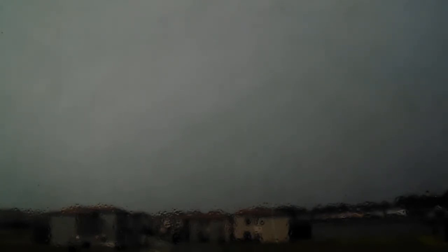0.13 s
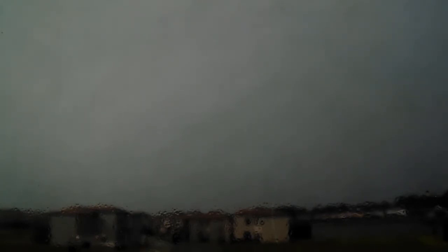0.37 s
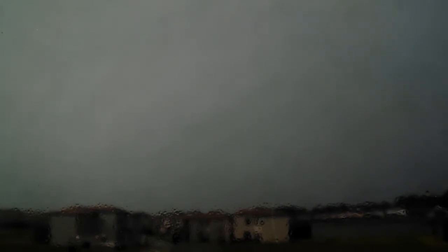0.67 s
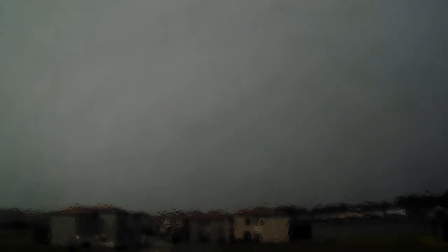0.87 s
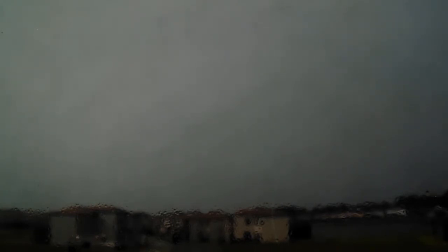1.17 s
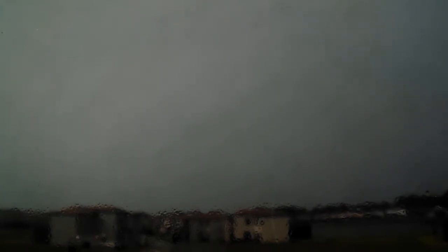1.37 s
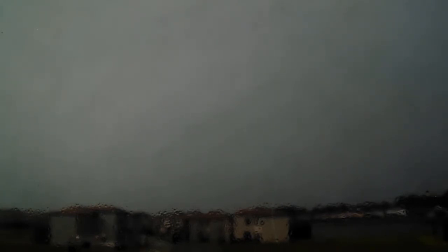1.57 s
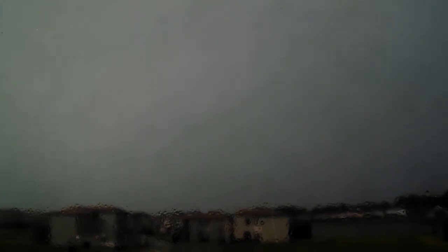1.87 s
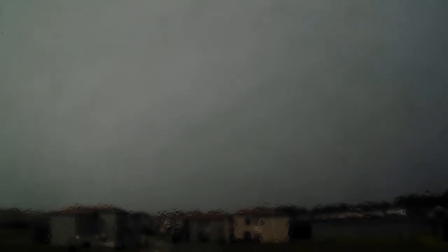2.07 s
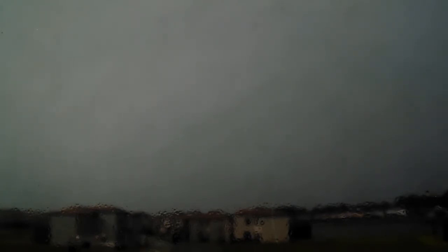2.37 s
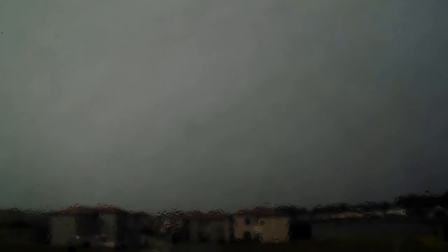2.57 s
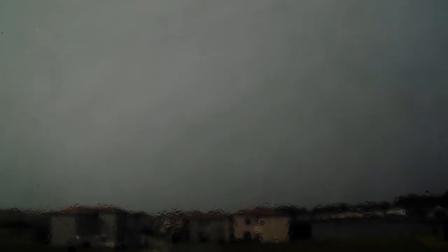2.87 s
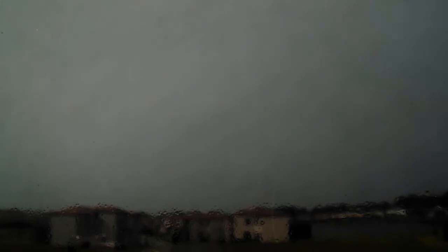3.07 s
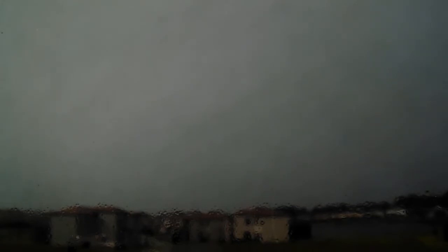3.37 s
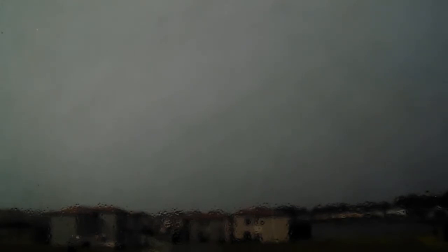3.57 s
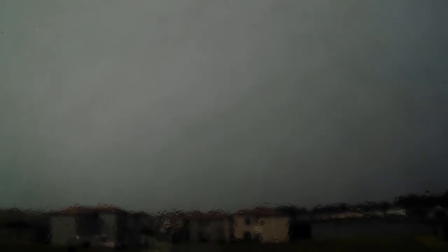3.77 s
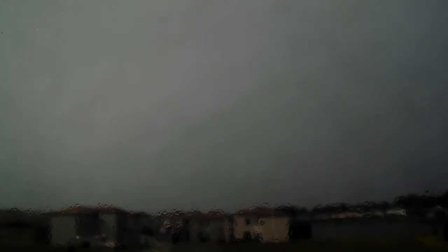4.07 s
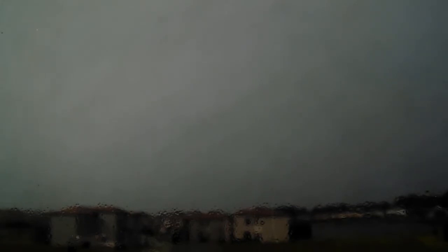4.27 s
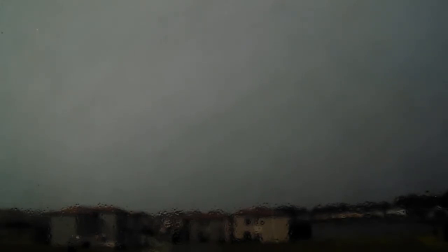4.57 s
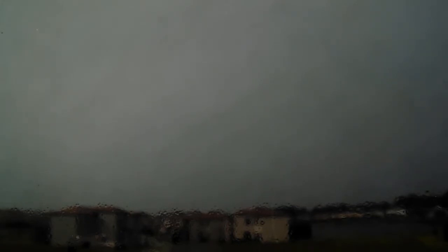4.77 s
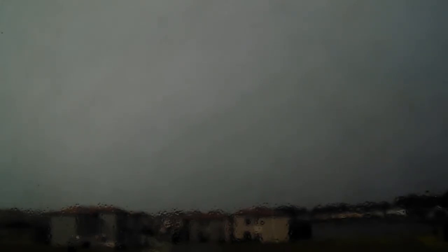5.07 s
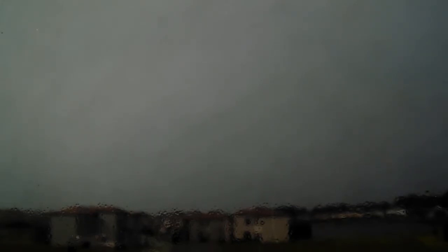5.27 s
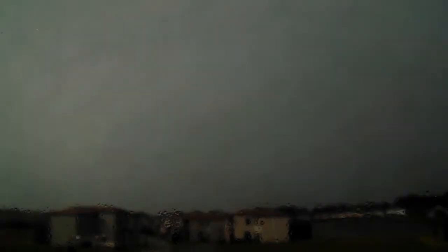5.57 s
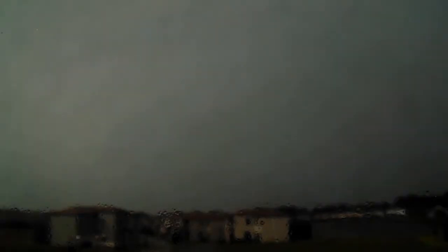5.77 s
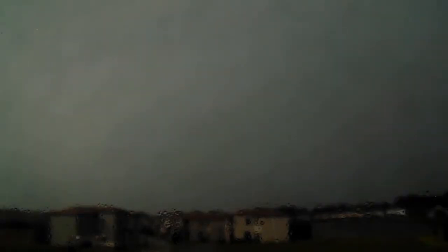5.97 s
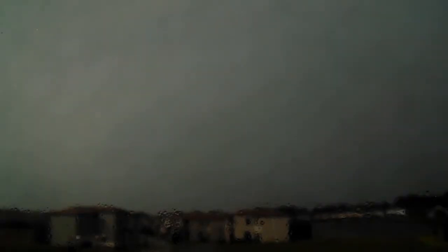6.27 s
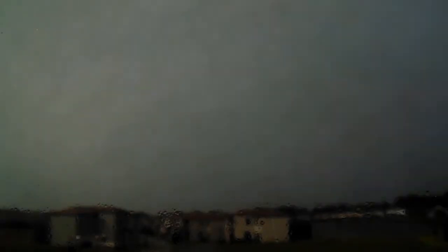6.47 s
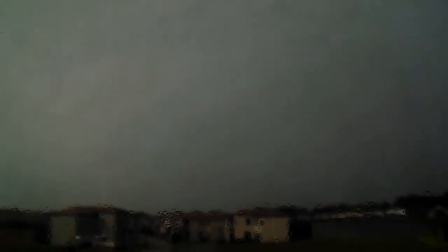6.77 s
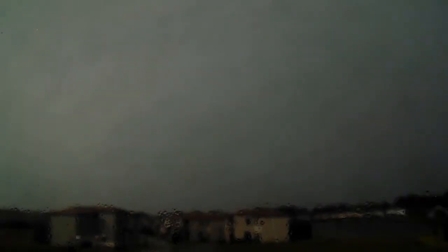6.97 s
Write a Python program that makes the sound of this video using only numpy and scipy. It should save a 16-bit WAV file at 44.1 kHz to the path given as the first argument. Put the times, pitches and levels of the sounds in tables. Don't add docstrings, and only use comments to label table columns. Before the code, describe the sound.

Inside a small room beside a window during a downpour. Far rain makes a steady soft wash and hiss. Close by, sharp bright drops tick and splatter irregularly on a metal sill, with glassy spits and duller knocks on the frame. Low thunder rolls in uneven waves for the first two seconds, then fades; near the end the dripping thins out.

```python
import sys
import numpy as np
from scipy import signal
from scipy.fft import rfft, irfft, next_fast_len
from scipy.io import wavfile
from scipy.ndimage import uniform_filter1d

SR = 44100
rng = np.random.default_rng(int(sys.argv[2]) if len(sys.argv) > 2 else 0)


def makeup_ratio(level_db):
    decades = np.asarray(level_db, float) / 20
    return 10 ** decades


def unload_audio(sound):
    columns = np.transpose(np.atleast_2d(sound))
    steps = np.round(np.clip(columns, -1, 1) * 32767)
    wavfile.write(sys.argv[1], SR, steps.astype(np.int16))


N = 314543

# f/Hz, width/Hz, level/dB
SILL_MODES = [(3535, 172, 2), (3650, 142, 6), (3850, 140, 4), (4010, 134, 2), (4360, 87, 5.5),
              (4575, 275, 1.5), (4870, 280, -24.5), (5380, 150, -21), (6270, 360, -22)]
# f/Hz, width/Hz, level/dB
PANE_MODES = [(6340, 790, 13.5), (7300, 83, 11), (7720, 1400, 8.5), (8380, 150, 12), (10000, 1100, 12),
              (10200, 520, 13), (12900, 960, -24)]
# t/s, peak level/dB, centre f/Hz
SPLASHES = [(0.0468, -15.5, 4560), (0.196, -13.5, 3840), (0.2628, -16.5, 4540), (0.5049, -16.5, 3970),
            (0.872, -16.5, 3870), (1.1912, -21, 4370), (1.8046, -19, 4580), (1.8606, -15, 4000),
            (2.0535, -20.5, 3670), (2.335, -22, 3640), (2.5975, -9, 3800), (2.6532, -18.5, 3740),
            (3.041, -17, 4120), (3.1772, -20.5, 3740), (3.2565, -16, 4550), (3.3348, -18, 4850),
            (3.495, -21, 3680), (3.5633, -19, 3900), (3.679, -20.5, 4450), (3.8328, -17.5, 4540),
            (3.8833, -11.5, 4450), (4.0496, -19, 4030), (4.0911, -18, 4360), (4.8984, -13, 4300),
            (5.2087, -17, 4000), (5.4202, -17, 3800), (5.5244, -20, 3980), (5.9189, -19, 3850),
            (6.391, -22.5, 4450), (6.5588, -23.5, 4100)]
# t/s, peak level/dB, centre f/Hz
SPLATTERS = [(0.7323, -17, 3740), (0.892, -19.5, 5100), (0.9307, -19, 3240), (0.97, -17.5, 4020),
             (1.13, -20.5, 3680), (1.2138, -17.5, 4240), (1.415, -18.5, 4440), (1.5357, -18.5, 4660),
             (1.964, -16, 3700), (2.0168, -22, 4460), (2.089, -15.5, 4200), (2.2338, -21, 3650),
             (2.5721, -18.5, 4300), (2.8444, -18, 4160), (2.8924, -15.5, 4400), (3.2816, -19.5, 4400),
             (3.4505, -21, 3750), (3.6, -18.5, 4450), (4.249, -21, 4360), (4.461, -23.5, 3940),
             (4.594, -20, 4380), (4.7543, -21, 3920), (4.9734, -21, 4310), (5.017, -23.5, 3740),
             (5.3398, -18.5, 4030), (5.777, -24, 3400), (6.0408, -21.5, 4400), (6.2013, -26.5, 3610),
             (6.6543, -26.5, 4590), (6.9546, -24, 4400)]
SILL_STRIKE, FRAME_STRIKE, PANE_STRIKE = 5.5, 12.0, 2.5


def resonance(f, hz, width_hz):
    return 1j * f * width_hz / (hz ** 2 - f ** 2 + 1j * f * width_hz)


def body(f, modes, between_db):
    response = 1j * makeup_ratio(between_db)
    for k, (hz, width_hz, db) in enumerate(modes):
        response = response + (-1) ** k * makeup_ratio(db) * resonance(f, hz, width_hz)
    return response


def unit(x):
    return x / np.sqrt(np.mean(x ** 2))


def shaped(x, response):
    size = next_fast_len(N + SR)
    f = np.arange(1, size // 2 + 2) * SR / size
    return unit(irfft(rfft(x, size) * response(f), size)[:N])


def even(x, span_s):
    return x / np.sqrt(uniform_filter1d(x ** 2, size=int(span_s * SR)))


def walk(rate):
    k = int(SR / rate)
    steps = np.repeat(rng.standard_normal(N // k + 1), k)
    return uniform_filter1d(uniform_filter1d(steps, k), k)[:N]


def curves(rows):
    s, *columns = np.transpose(rows)
    return [np.interp(np.arange(N) / SR, s, c) for c in columns]


def drops(s, peak_db, hz, spread, t60_s, modes, rise_s, between_db, skirt_db, ragged_db, strike):
    size = 4096
    t = np.arange(size) / SR
    f = np.arange(1, size // 2 + 2) * SR / size
    noise, lumps = rng.standard_normal((len(s), 2, size)).transpose(1, 0, 2)
    lumps = unit(uniform_filter1d(lumps, size=60))
    length_s = t60_s * makeup_ratio(1.5 * noise[:, :1])
    shape = (1 - np.exp(-t / rise_s)) * makeup_ratio(-60 * t / length_s + ragged_db * lumps)
    contact = strike * np.exp(-2j * np.pi * f * 0.0008)
    centre = resonance(f, hz[:, None], (spread * hz)[:, None])
    colour = centre * (centre + makeup_ratio(skirt_db)) * body(f, modes, between_db)
    bursts = irfft((rfft(noise * shape) + contact) * colour, size)
    bursts *= (makeup_ratio(peak_db) / np.abs(bursts).max(axis=1))[:, None]
    out = np.zeros(N + size)
    for start, burst in zip((s * SR).astype(int), bursts):
        out[start:start + size] += burst
    return out[:N]


def scatter(count, lo_hz, hi_hz, size_db, most_db):
    when, pitch, big = rng.random((count, 3)).T
    level_db = np.minimum(-size_db * np.log(big), most_db)
    return when * N / SR, level_db, lo_hz * (hi_hz / lo_hz) ** pitch


def far_drops(points, swell_db, flicker_db, flicker_rate):
    hz, db = np.transpose(points)
    f = np.arange(1, N // 2 + 2) * SR / N
    tilt = makeup_ratio(np.interp(np.log(f), np.log(hz), db))
    swell = walk(2.67)
    out = 0
    for centre in hz[0] * 2 ** np.arange(0, np.log2(hz[-1] / hz[0]), 1 / 2):
        band = np.clip(1 - 2 * np.abs(np.log2(f / centre)), 0, 1) ** 0.5
        part = irfft(rfft(rng.standard_normal(N)) * tilt * band, N)
        out = out + part * makeup_ratio(swell_db * swell + flicker_db * walk(flicker_rate))
    return unit(out)


def downpour():
    # t/s, wash level/dB, hiss level/dB, sill patter level/dB
    pour = [
        (0.0, -37.5, -39.5, -38),
        (0.79, -37.5, -40.5, -40.5),
        (5.36, -38, -40.5, -37),
        (5.58, -40, -42, -56),
        (7.13, -40, -42, -49.5),
    ]
    # f/Hz, level/dB
    wash_colour = [(15, -49), (25, 6), (64, -2.5), (146, -2), (300, -3), (475, -6), (558, -5), (668, -9.5),
                   (784, -6.5), (902, -11), (3000, -19.5), (3900, -23), (6600, -120)]
    # f/Hz, level/dB
    hiss_colour = [(1470, -44), (2500, -32), (2930, -5), (3990, 5.5), (5280, 2.5), (13600, -1.5),
                   (14500, 9), (14900, -48), (15200, -79)]
    wash_db, hiss_db, patter_db = curves(pour)
    small = scatter(count=800, lo_hz=3200, hi_hz=5550, size_db=1.5, most_db=6)
    patter = drops(*small, spread=0.6, t60_s=0.031, modes=SILL_MODES, rise_s=0.00081,
                   between_db=-17, skirt_db=0, ragged_db=6.1, strike=SILL_STRIKE)
    fine = scatter(count=400, lo_hz=6100, hi_hz=14000, size_db=3.5, most_db=12.0)
    spray = drops(*fine, spread=0.6, t60_s=0.046, modes=PANE_MODES, rise_s=0.0012,
                  between_db=8.0, skirt_db=3.8, ragged_db=5.1, strike=PANE_STRIKE)
    wash = far_drops(wash_colour, swell_db=0.6, flicker_db=1.2, flicker_rate=14)
    hiss = far_drops(hiss_colour, swell_db=0.3, flicker_db=1.7, flicker_rate=26)
    spray_db = hiss_db + 0.24 * (patter_db + 46.0) - 3.5
    far = wash * makeup_ratio(wash_db + 5.5) + hiss * makeup_ratio(hiss_db + 1.0)
    return far + unit(patter) * makeup_ratio(patter_db - 2.5) + unit(spray) * makeup_ratio(spray_db)


def roll():
    # crest t/s, growl level/dB, deep level/dB, half length/s
    surges = [(.13, -22, -30, 0.067), (0.34, -20, -20.5, 0.032), (.45, -19.5, -24, 0.064),
              (0.557, -16.5, -19.5, 0.037), (.66, -26, -37, 0.043), (.82, -27, -36, 0.044),
              (0.964, -17, -22, 0.062), (1.12, -17, -22.5, 0.043), (1.248, -20, -31, 0.055),
              (1.35, -27, -26.5, .04), (1.466, -22.5, -32, 0.057), (1.656, -24.5, -31.5, 0.046),
              (1.86, -21.5, -27, 0.056), (2.067, -18, -17, 0.051), (2.176, -24.5, -26.5, 0.082),
              (2.633, -26.5, -32, 0.062), (3.03, -28, -45, 0.031), (3.34, -27.5, -37, 0.097),
              (3.912, -29.5, -36, 0.13), (4.7, -36, -35, .08), (4.95, -32, -38.5, 0.085),
              (5.22, -28, -43, 0.06), (5.595, -35.5, -33, 0.042), (5.8, -36, -34, 0.033)]
    t = np.arange(0, N, 64) / SR
    s, growl_db, deep_db, half_s = np.transpose(surges)[:, :, None]
    side_s = half_s * np.where(t > s, 1.08, 1)
    bell = np.exp(-((t - s) / side_s) ** 2)
    gains = []
    for surge_db, bed_db in ((deep_db, -38), (growl_db, -31.5)):
        bed = makeup_ratio(2 * (bed_db - 1.0 * t))
        power = np.sum(bell * makeup_ratio(2 * surge_db), axis=0) + bed
        gains.append(np.interp(np.arange(N) / SR, t, power ** 0.5))
    return gains


def thunder():
    # f/Hz, width/Hz, level/dB
    deep_modes = [(40, 22, -6.5), (70, 23.4, 0.5), (98, 8, 2), (116, 20, -4)]
    # f/Hz, width/Hz, level/dB
    growl_modes = [(172.4, 59, -7.5), (196.5, 11.9, 3), (250.3, 43.6, -1), (281.5, 27, 3.5),
                   (317.8, 12.2, 6), (343.8, 23, -1.5), (414, 47, -8.5), (780, 23, -40)]
    # t/s, level/dB
    sing_levels = [
        (0.0, -49),
        (1.0, -41.5),
        (1.75, -41.5),
        (2.05, -34.5),
        (2.4, -46),
        (4.0, -45.5),
        (7.13, -61),
    ]
    deep_gain, growl_gain = roll()
    cracks = rng.standard_normal((3, N)) * (rng.random((3, N)) < 0.02)
    deep = shaped(cracks[0], lambda f: body(f, deep_modes, -20.5) * resonance(f, 79, 86))
    growl = shaped(cracks[1], lambda f: body(f, growl_modes, -23.5) * resonance(f, 164, 216))
    sing = shaped(cracks[2], lambda f: resonance(f, 552.3, 22.0) ** 2)
    throb = makeup_ratio(1.5 * walk(16))
    rumble = throb * (even(deep, 0.22) * deep_gain + even(growl, 0.1) * growl_gain)
    return rumble + even(sing, 0.23) * makeup_ratio(curves(sing_levels)[0] - 0.5)


def sill_drops(rows, t60_s):
    return makeup_ratio(1.0) * drops(*np.transpose(rows), spread=0.43, t60_s=t60_s, modes=SILL_MODES, rise_s=0.00053,
                            between_db=-0.5, skirt_db=0, ragged_db=5.2, strike=SILL_STRIKE)


def lesser_drips():
    count, gap_s, clear_s, gust_end_s = 120, 0.055, 0.025, 5.55
    late, pitch, size = rng.random((count, 3)).T
    s = (np.arange(count) + late * 0.9) * gap_s
    big_s = np.array(SPLASHES + SPLATTERS)[:, 0]
    clear = np.abs(s[:, None] - big_s).min(axis=1) > clear_s
    rows = np.array([s, -20 + 2.5 * np.log(size), 3400 * (5200 / 3400) ** pitch])
    rows = rows[:, clear & (s < gust_end_s)]
    return drops(*rows, spread=0.45, t60_s=0.043, modes=SILL_MODES, rise_s=0.0006,
                 between_db=-3, skirt_db=0, ragged_db=3.2, strike=SILL_STRIKE)


def pane_spits():
    # t/s, peak level/dB, centre f/Hz
    spits = [(0.0568, -19, 13300), (0.1825, -22, 7540), (0.2508, -27, 7410), (0.7432, -21, 8120),
             (0.9916, -15.5, 6770), (1.4152, -14.5, 6940), (1.534, -23, 6870), (1.7694, -20.5, 7320),
             (1.965, -20, 6800), (2.0173, -22, 8830), (2.2552, -15, 7650), (2.582, -13, 7410),
             (2.5985, -15, 7920), (2.6324, -22, 12500), (3.0914, -18, 12100), (3.1078, -17, 6860),
             (3.4501, -24, 9430), (3.5064, -21, 7500), (3.557, -21, 6840), (4.3625, -23, 9380),
             (4.3914, -23, 6860), (4.4994, -24, 7610), (4.6156, -8, 10200), (4.7331, -23, 7430),
             (4.8459, -25, 6810), (4.9742, -22, 7500), (5.3403, -21, 7530), (5.4784, -21.5, 6780),
             (6.0412, -20, 6800), (6.3915, -20, 7410)]
    return makeup_ratio(2.2) * drops(*np.transpose(spits), spread=0.46, t60_s=0.021, modes=PANE_MODES, rise_s=0.0018,
                            between_db=18, skirt_db=4.7, ragged_db=3.2, strike=PANE_STRIKE)


def frame_knocks():
    # t/s, peak level/dB, centre f/Hz, width as share
    knocks = [(0.16, -27, 1280, 0.29), (0.246, -29, 1680, 0.07), (0.279, -30.5, 1050, 0.16),
              (0.422, -35, 1070, 0.2), (0.506, -25.5, 1050, 0.21), (0.845, -22, 1120, 0.25),
              (0.928, -24, 1430, 0.5), (1.24, -29, 925, 0.34), (1.339, -28.5, 1290, 0.27),
              (1.963, -32, 1020, 0.22), (2.505, -27.5, 1110, 0.32), (2.576, -22, 1410, 0.4),
              (2.6, -11.5, 1170, 0.4), (2.653, -13.5, 1260, 0.25), (2.795, -17, 1250, 0.36),
              (3.041, -28.5, 1000, 0.33), (4.016, -25, 1280, 0.18), (4.618, -28, 1226, 0.2),
              (4.991, -22.5, 1350, 0.2), (5.32, -22.5, 1100, 0.17), (5.461, -21, 1190, 0.53),
              (5.896, -26.5, 1130, 0.11), (6.31, -26.5, 1130, 0.22), (6.351, -27, 1130, 0.096),
              (6.97, -27, 1370, 0.36), (7.047, -28, 1330, 0.26), (7.082, -28, 860, 0.29),
              (0.16, -25, 1710, 0.35),
        (2.5985, -11, 1970, 0.42),
        (2.598, -20, 2500, 0.5),
        (2.796, -28, 1600, 0.4),
        (5.464, -23.5, 1900, 0.44),
        (5.894, -28, 1690, 0.3),
        (6.3125, -28, 1890, 0.46),
    ]
    # f/Hz, width/Hz, level/dB
    frame_modes = [(1020, 50, -30), (1130, 65, -27), (1290, 650, -12), (1430, 65, -11), (1680, 33, -18.5),
                   (1940, 110, -1.5)]
    out = drops(*np.transpose(knocks), t60_s=0.035, modes=frame_modes, rise_s=0.000076,
                between_db=1, skirt_db=-1.5, ragged_db=1.0, strike=FRAME_STRIKE)
    lag = int(0.0065 * SR)
    out[lag:] += makeup_ratio(-9) * out[:-lag]
    return makeup_ratio(4.5) * out


def room_tail(near):
    t = np.arange(SR // 4) / SR
    tail = rng.standard_normal(len(t)) * makeup_ratio(-60 * t / 0.21) * (t > 0.004)
    return signal.fftconvolve(near, tail / np.sqrt(np.sum(tail ** 2)))[:N]


def scene():
    far = downpour() + thunder()
    near = sill_drops(SPLASHES, t60_s=0.052) + lesser_drips() + pane_spits() + frame_knocks()
    near = near + sill_drops(SPLATTERS, t60_s=0.14)
    return (near + makeup_ratio(-14) * room_tail(near) + far)[None]


def top_cut(x):
    return signal.sosfilt(signal.butter(12, 14170, fs=SR, output="sos"), x)


def record(dry):
    spectrum = rfft(dry)
    f = np.arange(spectrum.shape[1]) * SR / N
    top_db = np.interp(f, [14160, 14220], [0, -24])
    mix = irfft(spectrum * makeup_ratio(top_db), N)
    return top_cut(mix)


dry = scene()
out = record(dry)
unload_audio(out)
```